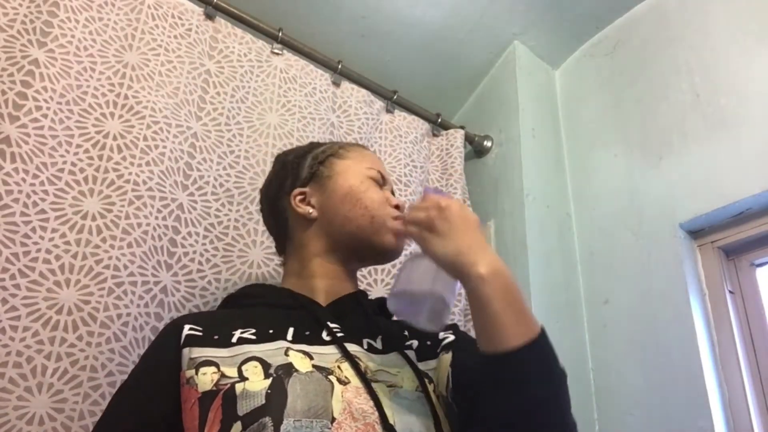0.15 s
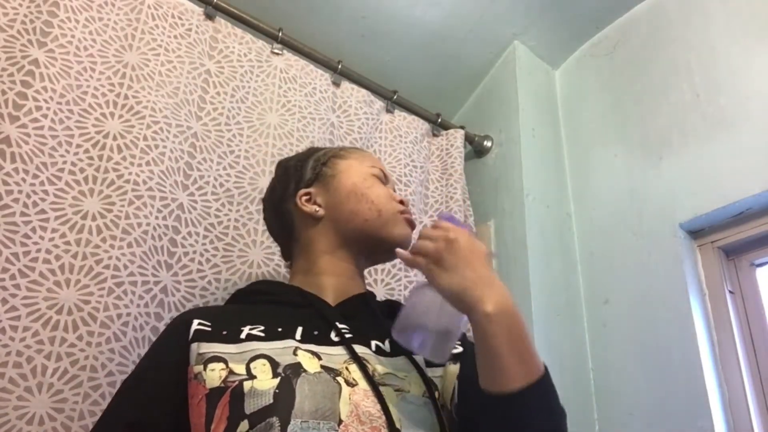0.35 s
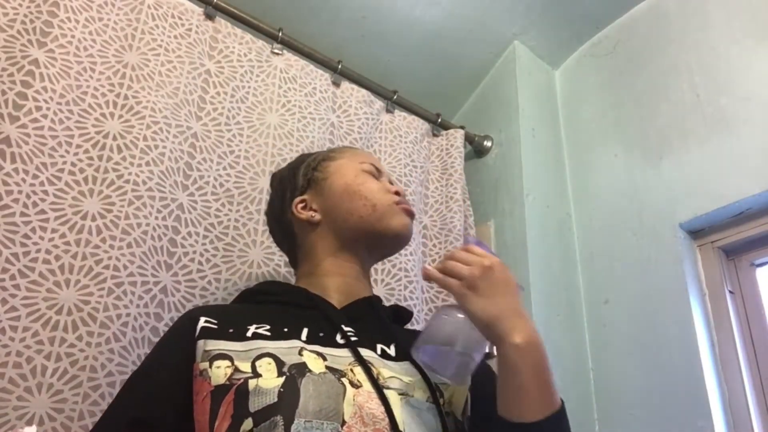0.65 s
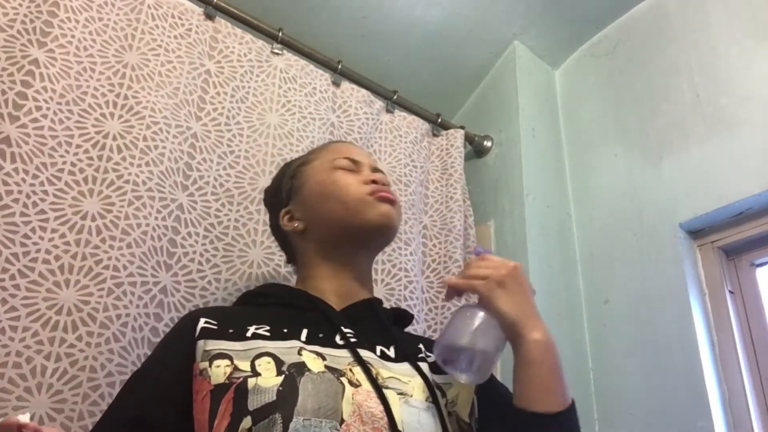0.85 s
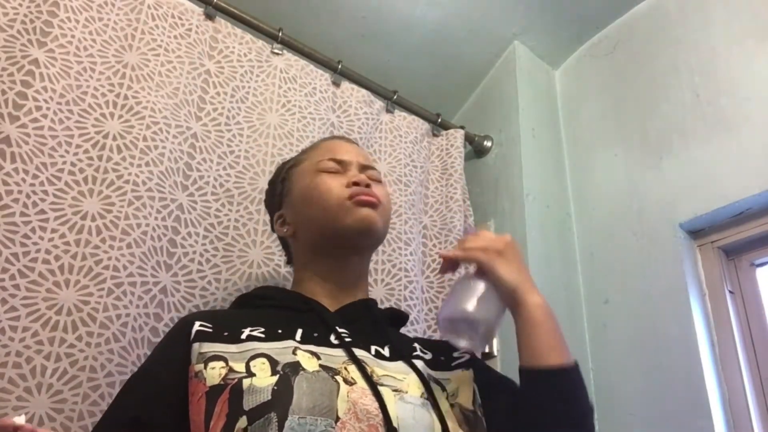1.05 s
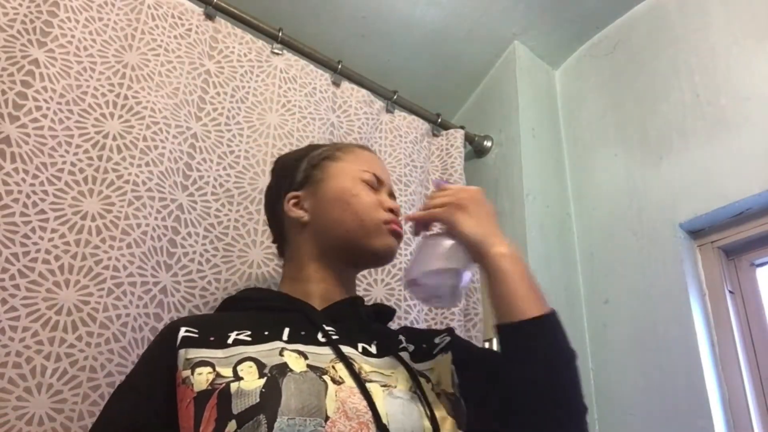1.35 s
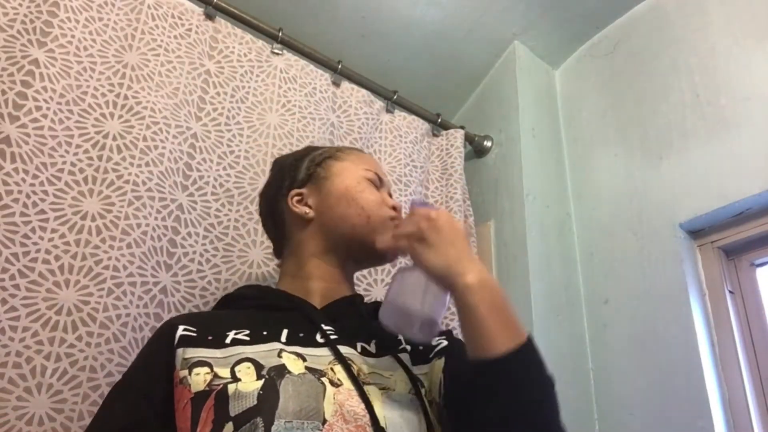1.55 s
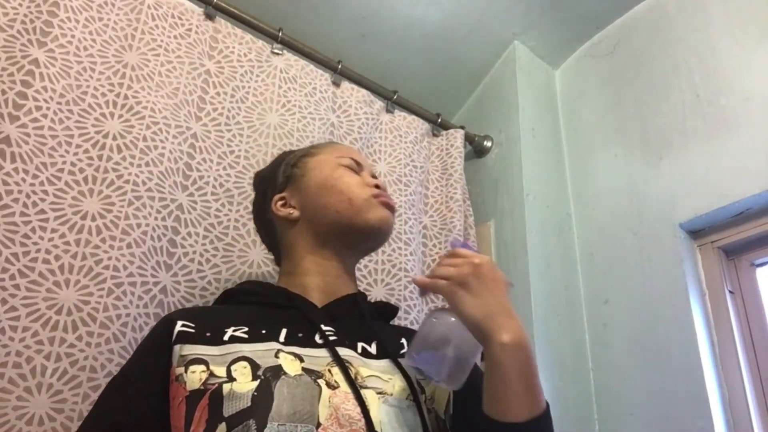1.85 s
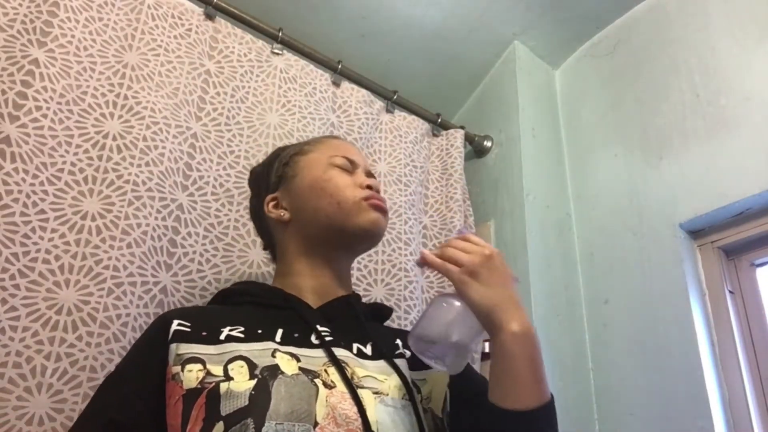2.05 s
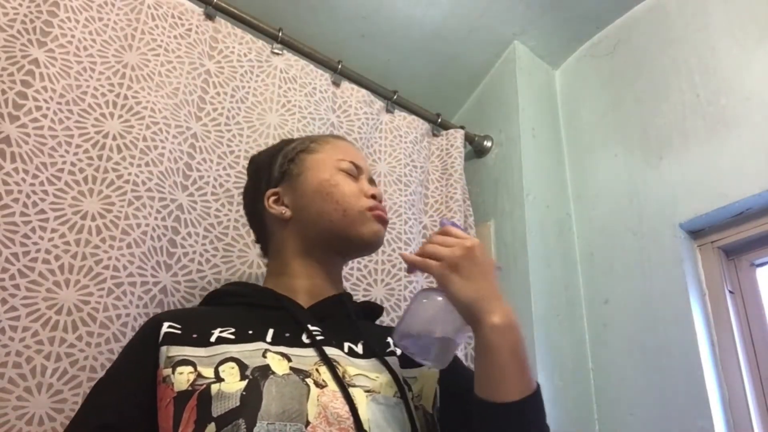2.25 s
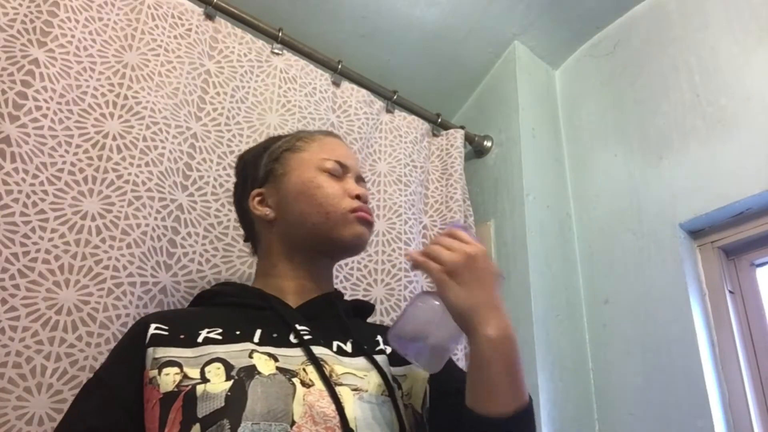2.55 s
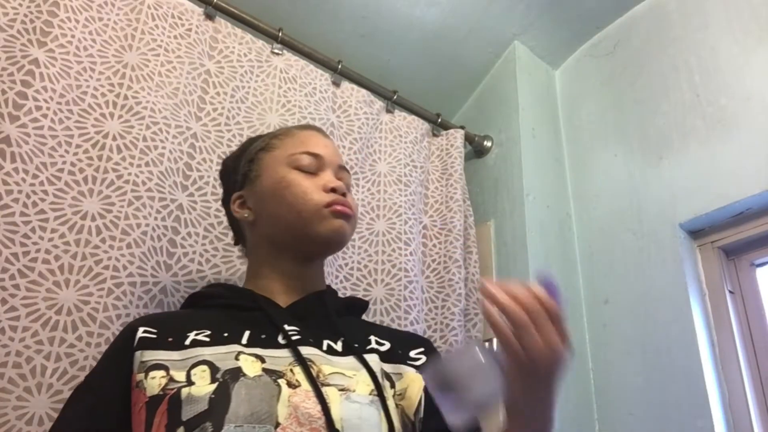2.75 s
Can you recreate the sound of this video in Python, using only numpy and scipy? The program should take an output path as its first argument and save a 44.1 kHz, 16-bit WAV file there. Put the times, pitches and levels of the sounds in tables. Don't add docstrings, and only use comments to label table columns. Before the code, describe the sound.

A small plastic spray bottle pumped rapidly, clicking and hissing mist in an echoing tiled bathroom

```python
import sys
import numpy as np
from scipy import signal
from scipy.fft import rfft, irfft, next_fast_len
from scipy.io import wavfile
from scipy.ndimage import uniform_filter1d, map_coordinates

SR = 44100
rng = np.random.default_rng(int(sys.argv[2]) if len(sys.argv) > 2 else 0)


def pcm_store(signal):
    levels = np.round(np.clip(np.atleast_2d(signal), -1, 1) * 32767)
    wavfile.write(sys.argv[1], SR, levels.astype(np.int16).T)


def elevation(decibels):
    levels = np.asarray(decibels, float)
    return 10 ** (levels / 20)


N = 127890

# start in seconds, peak in dB, level of the low knock under it in dB.
PRESSES = [
    (.128, -47, -17),
    (.39, -30.5, -8),
    (.67, -25, -12),
    (.953, -38, -7),
    (1.212, -29, -7),
    (1.492, -38.5, -21),
    (1.756, -27, -13),
    (2.038, -30, -12.5),
    (2.328, -29, -14),
]
# start in seconds, peak in dB, suction against the peak in dB,
# suction length in seconds.
RETURNS = [
    (0.035, -31, -9, 0.04),
    (0.3153, -26.5, -18, 0.032),
    (0.5887, -29, -10, 0.042),
    (0.8771, -30, -7, 0.017),
    (1.1438, -30.5, -8, 0.013),
    (1.4075, -28.5, -11, 0.031),
    (1.6757, -27, -11.5, 0.052),
    (1.9665, -31, -4.5, 0.031),
    (2.2592, -25.5, -11.5, 0.034),
    (2.5562, -28, -9.5, 0.034),
]
# frequency in Hz, width in Hz, level in dB.
PUMP_HEAD = [(1640, 160, -6), (2210, 280, 1), (2890, 290, -2), (3260, 140, 1.5), (3850, 120, -8.5),
             (4005, 135, 8), (6330, 340, -1.5), (8550, 500, -8)]


def unit(x):
    return x / np.sqrt(np.mean(x ** 2) + 1e-20)


def along(points, hz):
    f, v = np.transpose(points)
    return np.interp(np.log(hz + 1), np.log(f + 1), v)


def wobble(rate):
    points = rng.standard_normal(int(N * rate / SR) + 4)
    return map_coordinates(points, [np.arange(N) * rate / SR])


def coloured(x, spectrum, peaks=(), share=0):
    m = next_fast_len(len(x) + 8192)
    f = np.fft.rfftfreq(m, 1 / SR)
    lift = 1
    for centre, width, db in peaks:
        lift = lift + share * elevation(db) * 1j * f * width / (centre * centre - f * f + 1j * f * width)
    return unit(irfft(rfft(x, m) * elevation(along(spectrum, f)) * lift, m)[:len(x)])


def patchy(db):
    z = signal.stft(rng.standard_normal(N + 512), nperseg=256)[2]
    field = uniform_filter1d(rng.standard_normal(z.shape), 5, 0)
    field = uniform_filter1d(field, 6, 1)
    return unit(signal.istft(z * elevation(db * unit(field)), nperseg=256)[1][:N])


def gritty(per_s, db):
    spikes = (rng.random(N) < per_s / SR) * rng.standard_normal(N)
    return patchy(1.2) + elevation(db) * unit(spikes)


def decaying_tones(rows):
    t, total = np.arange(N) / SR, np.zeros(N)
    for s, swell, db, hz, t60 in rows:
        onset = np.sin(np.pi / 2 * np.clip((t - s) / swell, 0, 1)) ** 2
        decay = elevation(db - 60 * np.clip(t - s - swell, 0, 3) / t60)
        total += onset * decay * np.sin(2 * np.pi * hz * (t - s))
    return total


def mist():
    # start in seconds, pressure rise in seconds, hold in seconds, full hiss in dB,
    # first hiss below full in dB.
    strokes = [
        (.001, 0.0015, 0.0016, -46, -30),
        (0.118, 0.082, 0.041, -39.5, 5.5),
        (0.388, 0.063, 0.074, -37, 19),
        (0.668, 0.089, .04, -35, 13.5),
        (0.953, 0.062, 0.049, -37.5, 15),
        (1.212, 0.067, 0.044, -36, 17.5),
        (1.486, 0.066, 0.046, -37, 17.5),
        (1.755, 0.076, 0.049, -37.5, 14),
        (2.039, 0.076, 0.047, -36, 18),
        (2.328, 0.077, .04, -37.5, 16),
    ]
    # start in seconds, rise in seconds, hold in seconds, level in dB.
    spits = [
        (.122, .011, .004, -42),
        (.2885, .006, .012, -39.5),
    ]
    # frequency in Hz, level in dB.
    jet_colour = [(180, -62), (300, -30.5), (433, -26.5), (624, -14.5), (1080, -19), (1320, -10),
                  (3950, -2.5), (6620, -6.5), (16000, -18)]
    fizz_colour = [(1500, -19), (4000, -4), (6800, -1.5), (9000, -0.5), (13500, -1.5), (16000, 0)]
    # frequency in Hz, width in Hz, level in dB.
    nozzle = [(3760, 28, -22.5), (5170, 32, -36.5), (6700, 150, 0), (8800, 220, -12.5), (12800, 600, -9)]
    open_s, ebb_db_per_s = 0.0035, 522
    fizz_db, fizz_swell, fizz_ebb = -9, 0.95, 3.3
    t, flow, fine = np.arange(N) / SR, np.zeros(N), np.zeros(N)
    for s, rise, hold, db, first in strokes:
        u = t - s
        opening = np.clip(u / open_s, 0, 1)
        swell = first * (np.sin(np.pi / 2 * np.clip(u / rise, 0, 1)) ** 2 - 1)
        ebb = ebb_db_per_s * np.clip(u - rise - hold, 0, 1)
        flow += opening * elevation(db + swell - ebb)
        fine += opening * elevation(db + fizz_db + fizz_swell * swell - fizz_ebb * ebb)
    for s, rise, hold, db in spits:
        fine += np.clip((t - s) / rise, 0, 1) * elevation(db - 2700 * np.clip(t - s - rise - hold, 0, 1))
    jet = coloured(gritty(2000, -11), jet_colour, nozzle, 0.8)
    fizz = coloured(gritty(3300, -9), fizz_colour)
    flutter_db = 0.7 * (0.76 * wobble(25.55) + wobble(300))
    return elevation(1 + flutter_db) * (flow * jet + fine * fizz)


def rattle(events, colour, db):
    hold_s, chatter_t60, tick_db, tick_t60 = 0.0072, 0.049, 3, 0.005
    t, shape, ticks = np.arange(N) / SR, np.zeros(N), np.zeros(N)
    for s, peak, *_ in events:
        attack = np.clip((t - s) / 0.0011, 0, 1)
        shape += attack * elevation(peak - 60 * np.clip(t - s - hold_s, 0, 1) / chatter_t60)
        tick_s = s + 0.001
        ticks += (t > tick_s) * elevation(peak + tick_db - 60 * np.clip(t - tick_s, 0, 1) / tick_t60)
    chatter = elevation(1.35 * wobble(500)) * shape * coloured(gritty(2000, -3.5), colour, PUMP_HEAD, 1)
    return elevation(db) * (chatter + ticks * coloured(rng.standard_normal(N), colour))


def press_clicks():
    # frequency in Hz, level in dB.
    click_colour = [(150, -38), (250, -9), (501, -5), (845, -5.5), (1790, -5), (5540, -8.5), (6250, -5.5),
                    (12800, -10), (16000, -19)]
    return rattle(PRESSES, click_colour, -8.5)


def return_clacks():
    # frequency in Hz, level in dB.
    clack_colour = [(150, -73), (250, -22), (3710, -0.5), (4570, -14), (6590, -6.5), (7570, -18.5),
                    (11900, -19.5), (16000, -37)]
    return rattle(RETURNS, clack_colour, -9.5)


def suction():
    # frequency in Hz, level in dB.
    gurgle_colour = [(150, -46), (250, -13), (761, -2), (938, -16), (1580, 5), (1790, -7), (6250, -1),
                     (13200, -18), (16000, -26)]
    t, shape = np.arange(N) / SR, np.zeros(N)
    for s, peak, db, length in RETURNS:
        shape += (t > s) * elevation(peak + db - 1040 * np.clip(t - s - length, 0, 1))
    gurgle = coloured(gritty(2000, -16), gurgle_colour, PUMP_HEAD, 0.44)
    return elevation(-9.5 + 2.9 * wobble(150)) * shape * gurgle


def bottle():
    # frequency in Hz, level in dB, t60 in seconds.
    body = [(420, 3, .2), (605, -1, .09), (1050, -12, .05)]
    rows = []
    for s, peak, low in PRESSES:
        for hz, db, t60 in body:
            level = peak + low + db + rng.normal(0, 0.82) - 17.5
            rows.append((s, 0.004, level, hz, t60))
    return decaying_tones(rows)


def drops():
    # start in seconds, swell in seconds, level in dB, frequency in Hz, t60 in seconds.
    plops = [
        (.815, .012, -53, 1170, .15),
        (.578, .014, -57, 975, .12),
    ]
    return decaying_tones(plops)


def thumps():
    # start in seconds, swell in seconds, level in dB, frequency in Hz, t60 in seconds.
    knocks = [
        (.385, 0.0085, -55, 275, .25),
        (.12, 0.0076, -49.5, 605, 0.16),
    ]
    room_ring = [
        (.413, .042, -34, 282, .17),
        (.49, .035, -58, 278, .22),
        (2.408, .014, -49, 283, .28),
        (2.408, .006, -52, 172, .22),
        (2.408, .006, -53, 222, .2),
    ]
    return decaying_tones(knocks) + decaying_tones(room_ring)


def bathroom(x):
    # frequency in Hz, t60 in seconds.
    tiles = [(300, 0.43), (800, 0.42), (2000, .2), (5500, 0.14), (14000, 0.15)]
    hop, lag = SR // 40, round(0.003 * SR)
    wet = np.zeros(N + 2 * SR)
    fade = signal.windows.hann(2 * hop, sym=False)
    padded = np.pad(x, (hop, 2 * hop))
    for i in range(0, N + hop, hop):
        hz, t, z = signal.stft(rng.standard_normal(SR // 3), SR, nperseg=128)
        t60 = along(tiles, hz)[:, None]
        tail = signal.istft(z * elevation(-60 * t / t60) / np.sqrt(t60), SR, nperseg=128)[1]
        answer = signal.fftconvolve(padded[i:i + 2 * hop] * fade, tail / np.linalg.norm(tail))
        wet[i + lag:][:len(answer)] += answer
    return wet[hop:hop + N]


def hum(rows):
    t, total = np.arange(N) / SR, np.zeros(N)
    for hz, db, start, stop in rows:
        fade = np.clip(np.minimum(t - start + 0.12, stop - t) / 0.13, 0, 1)
        level = elevation(db + 2.5 * wobble(16))
        total += fade * level * np.sin(2 * np.pi * hz * t + 0.94 * wobble(30))
    return total


def background():
    # frequency in Hz, level in dB.
    air_colour = [(15, -90), (25, -56), (102, -25), (134, -13.5), (249, -6.5), (317, -15), (344, -15),
                  (439, -19), (16000, -32)]
    # frequency in Hz, peak level in dB, start in seconds, stop in seconds.
    fan = [(148.5, -75, 0, 4), (179.5, -80, 0, 4), (253, -69, 2.5, 4)]
    pipes = [(603, -70.5, 0, 1.75), (724, -70.5, 0, 1.55)]
    return elevation(-68.5) * coloured(patchy(1.4), air_colour) + hum(fan) + hum(pipes)


def scene():
    pump = mist() + press_clicks() + return_clacks() + suction()
    near = 0.65 * pump + bottle() + drops()
    walls = elevation(-3.5) * bathroom(pump)
    return (near + walls + thumps() + background())[None]


def roll_off(x):
    return signal.sosfilt(signal.butter(12, 16760, fs=SR, output="sos"), x)


def record(dry):
    low_cut_hz, shelf_hz, shelf_db, top_hz = 99, 15900, -37, 16600
    m = next_fast_len(N + 4096)
    f = np.fft.rfftfreq(m, 1 / SR)
    ratio = f / low_cut_hz
    bass_cut = (1j * ratio) ** 2 / (1 + 1.4j * ratio - ratio ** 2)
    treble_cut = np.where(f < shelf_hz, 1, elevation(shelf_db)) * (f < top_hz)
    kept = irfft(rfft(dry, m) * bass_cut * treble_cut, m)[:, :N]
    return roll_off(kept)


dry = scene()
out = record(dry)
pcm_store(out)
```